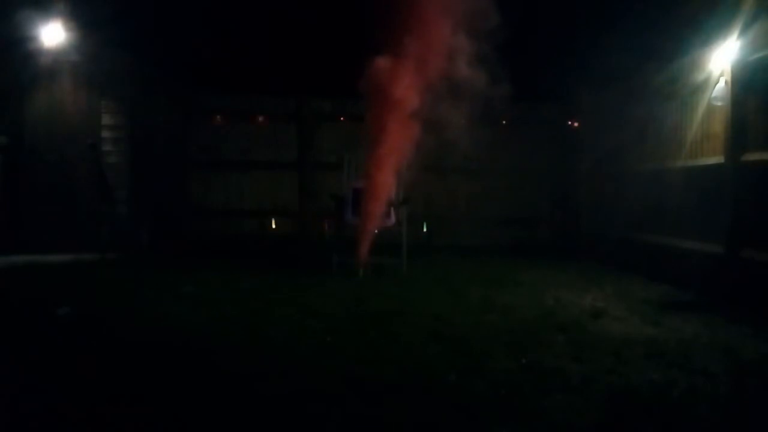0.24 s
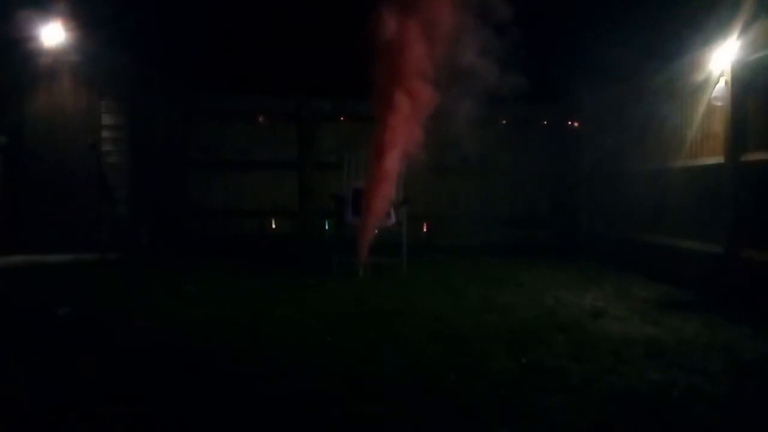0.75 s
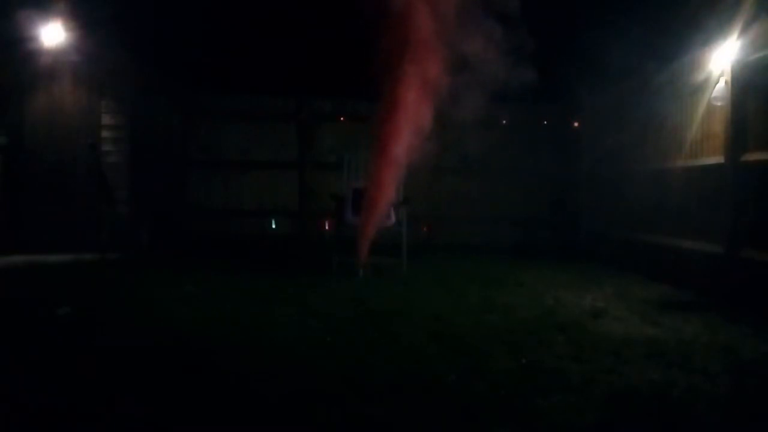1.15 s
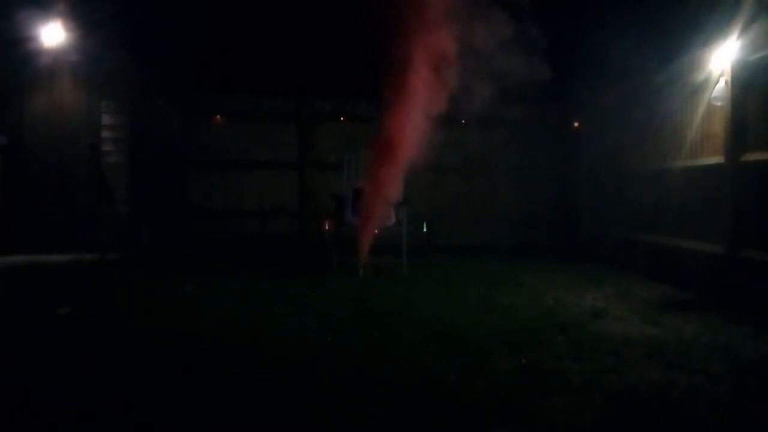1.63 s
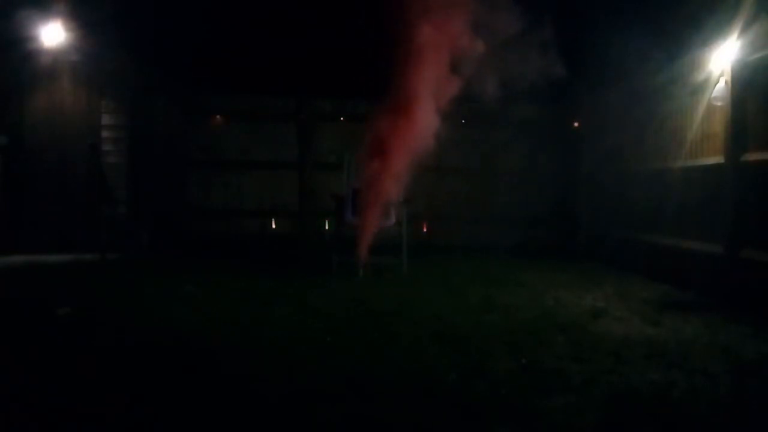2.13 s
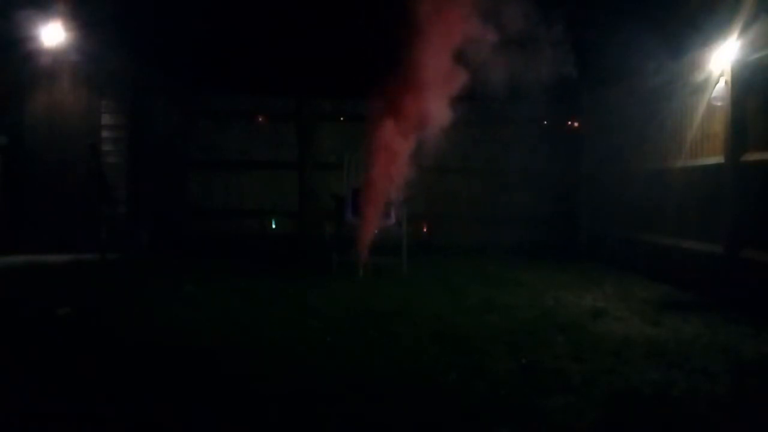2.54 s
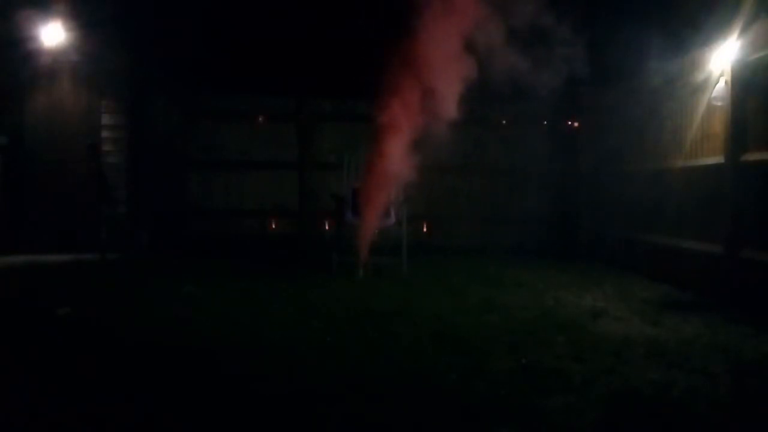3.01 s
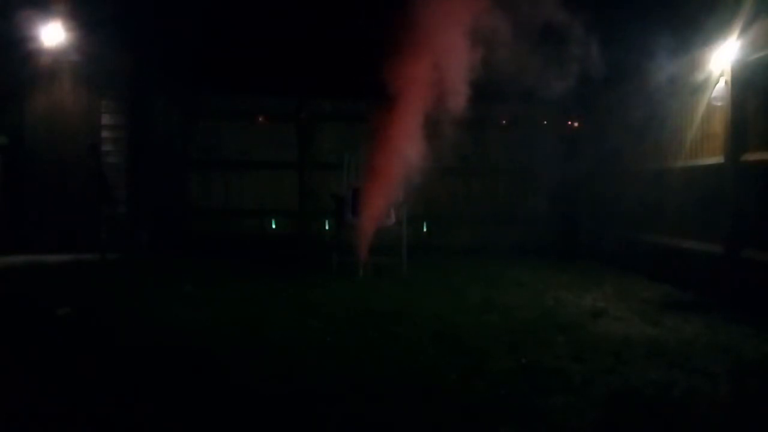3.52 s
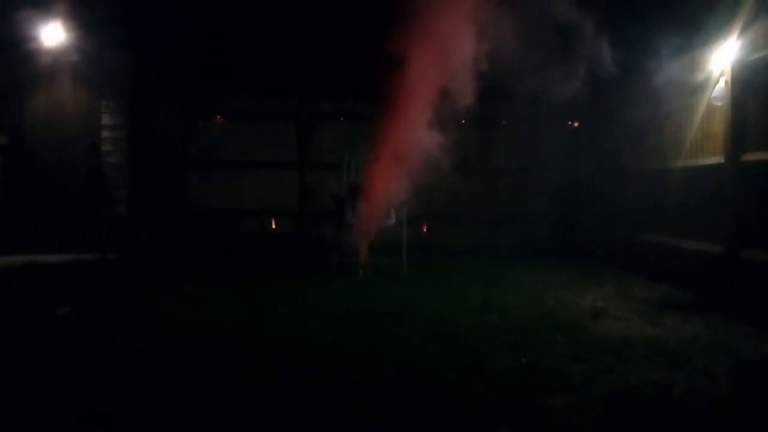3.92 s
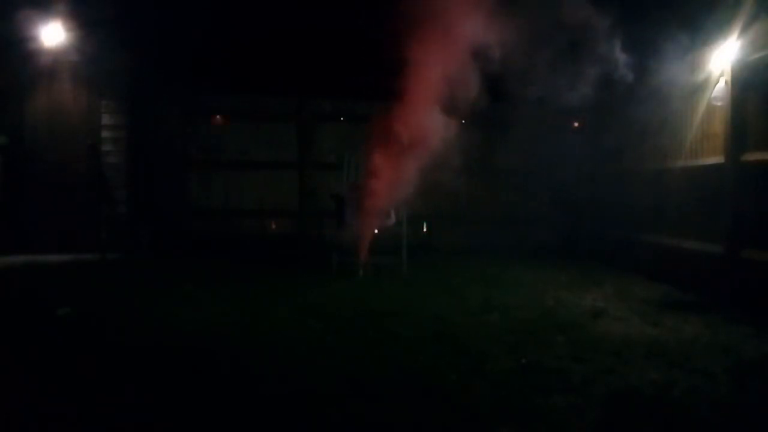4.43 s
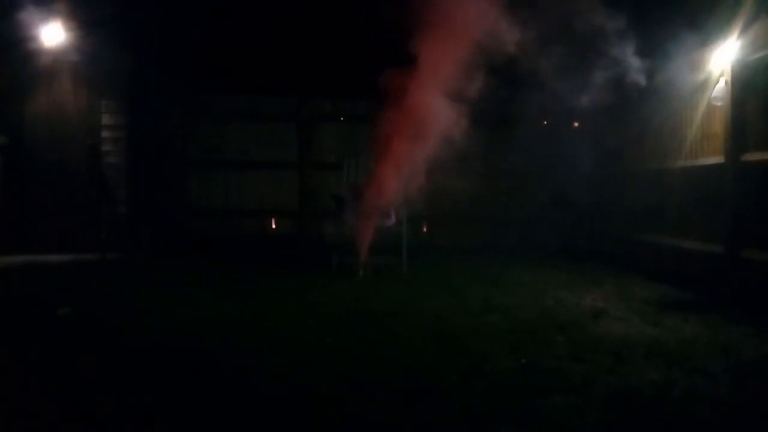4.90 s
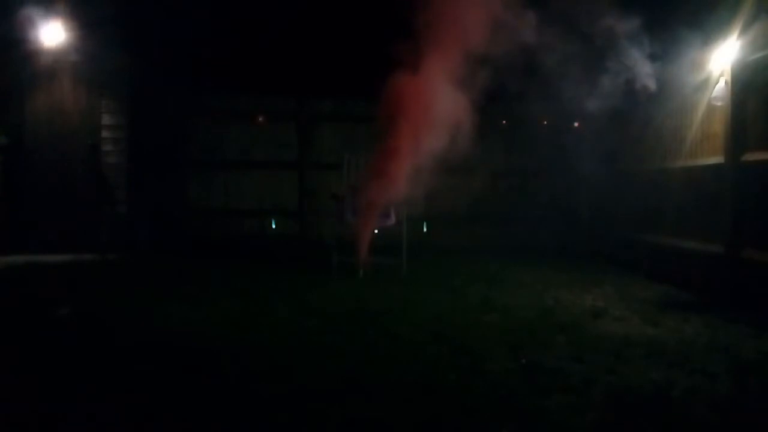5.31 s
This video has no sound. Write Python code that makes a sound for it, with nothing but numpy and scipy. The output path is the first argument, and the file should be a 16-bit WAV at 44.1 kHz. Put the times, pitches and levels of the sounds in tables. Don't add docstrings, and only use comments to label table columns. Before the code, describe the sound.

A smoke canister hisses throughout, about five and a half seconds, some metres from a hand-held camera in a walled yard. The hiss is dense and bright, mostly 2 to 8 kHz, with a softer roar around 1 kHz and a breathy band near 2 kHz. It starts slightly stronger, with a soft tap at 0.0, then settles, wavering gently as its treble colour shifts. A faint brush comes at 1.3 and dull, very low bumps around 1.6 to 1.8. At 2.9 a sharp crack bursts out, much louder than the hiss, breaking into an irregular volley of dull pops and gritty snaps for a quarter second; the yard's mid-low echo dies over about a second. Around 3.7 the gas gushes briefly. From 4.7 to 5.05 come soft camera knocks, the firmest near 4.9 with a quick downward scuff. Far traffic murmurs faintly underneath; the hiss runs to the end. Nearly mono.

```python
import sys
import numpy as np
from scipy import signal
from scipy.fft import irfft
from scipy.io import wavfile
from scipy.ndimage import uniform_filter1d, map_coordinates

SR = 44100
rng = np.random.default_rng(int(sys.argv[2]) if len(sys.argv) > 2 else 0)


def unload_wav(signal):
    wavfile.write(
        sys.argv[1],
        SR,
        np.round(np.clip(np.atleast_2d(signal).T, -1, 1) * 32767).astype(np.int16),
    )


def decibels_to_gain(level_db):
    exponent = np.asarray(level_db, float) / 20
    return 10 ** exponent


N = 245195


def evened(x):
    return x / np.sqrt(np.mean(x ** 2) + 1e-20)


def read(points, hz):
    f, value = np.transpose(points)
    return np.interp(np.log(hz + 1), np.log(f + 1), value)


def add(mix, s, sound):
    part = mix[max(round(s * SR), 0):][:len(sound)]
    part += sound[:len(part)]


def turbulence(shape, patchy_db, flicker_db):
    frames = N // 256 + 5
    hz = np.fft.rfftfreq(1024, 1 / SR)[:, None]
    real, imaginary, patches = rng.standard_normal((frames, 513, 3)).T
    patches = uniform_filter1d(patches, size=14, axis=0)
    patches = evened(uniform_filter1d(patches, size=24, axis=1))
    flicker = evened(uniform_filter1d(rng.standard_normal(frames), size=5))
    level = decibels_to_gain(read(shape, hz) + patchy_db * patches + flicker_db * flicker)
    spectra = (real + 1j * imaginary) * level
    return evened(signal.istft(spectra, nperseg=1024, noverlap=768)[1][:N])


def tail(decays, colour, start_ms):
    taps = np.zeros(SR)
    at = np.arange(0, SR - 20, 20)
    taps[at + rng.integers(0, 20, len(at))] = rng.choice([-1., 1.], len(at))
    hz, t, z = signal.stft(taps, SR, nperseg=512)
    level_db = read(colour, hz)[:, None] - 60 * t / read(decays, hz)[:, None]
    out = signal.istft(z * decibels_to_gain(level_db), SR, nperseg=512)[1]
    out *= np.clip(np.arange(len(out)) / SR / (start_ms / 1000), 0, 1)
    return out / np.linalg.norm(out)


# f/Hz, level/dB per Hz
HISS = [(940, -43.5), (1600, -22), (2200, -14), (2400, -6), (2600, -8), (2720, -4.5), (2980, -7),
        (3360, -5), (3640, -5), (3910, -4.5), (4380, -2.5), (4900, -4.5), (6520, -4), (7800, -17),
        (10100, -38.5), (17200, -120)]


def hiss(pressure_db):
    return decibels_to_gain(-37 + pressure_db) * turbulence(HISS, patchy_db=0.83, flicker_db=0.36)


# f/Hz, level/dB per Hz
FIZZ = [(4590, -14), (7800, -3.5), (8750, 0), (10900, -8), (11800, -15), (13300, -27), (13700, -37),
        (15100, -8.5), (15800, -29)]


def fizz(pressure_db):
    return decibels_to_gain(-61 + 1.6 * pressure_db) * turbulence(FIZZ, patchy_db=2.8, flicker_db=0.5)


# f/Hz, level/dB per Hz
ROAR = [(130, -66), (220, -27), (360, -13), (503, -5.5), (672, -3.5), (715, -1.5), (981, -2), (1170, -3.5),
        (1380, -6), (1800, -9.5), (2340, -15), (3960, -120)]


def roar(pressure_db, choke_db):
    level_db = -52 + 0.7 * pressure_db + 0.14 * choke_db
    return decibels_to_gain(level_db) * turbulence(ROAR, patchy_db=0.65, flicker_db=1.55)


def throat(choke_db):
    shape = [(1200, -61), (1650, 0.0), (2100, 5.5), (2500, -7.0), (3200, -36)]
    return decibels_to_gain(-59 + choke_db) * turbulence(shape, patchy_db=3.0, flicker_db=1.0)


# f/Hz, level/dB per Hz
SPURT = [(600, -36), (1060, -3), (1400, -16), (2000, -4.5), (2600, 0.5), (3150, -8), (4500, -5), (6300, 0),
         (7800, -17), (10500, -27), (13500, -50), (15500, -42)]
SPURT_DB = -32


def spurt(t):
    peak_s, rise_s, fall_s, edge_db = 3.69, 0.23, 0.15, -25.5
    away = np.where(t < peak_s, (peak_s - t) / rise_s, (t - peak_s) / fall_s)
    return decibels_to_gain(SPURT_DB + edge_db * away ** 2.2) * turbulence(SPURT, patchy_db=0.7, flicker_db=0.5)


# delay/ms, share of the direct sound
WALLS = [(1.097, .11), (1.38, .08), (1.8, .07), (2.54, .08), (5.374, .2), (5.62, .08), (6.111, .05),
         (6.4, .06), (7.183, -.05), (8.118, .05), (9.677, -.05), (12.14, .05), (12.491, .06), (14.184, .05),
         (16.344, -.07)]


def near_walls(gas, t):
    hz = np.fft.rfftfreq(4096, 1 / SR)
    echoes = sum(share * np.exp(-2j * np.pi * hz * ms / 1000) for ms, share in WALLS)
    comb = 1 + 1.3 * echoes
    wet = 0
    for k in range(3):
        far = tail([(300, 1.0), (3000, 0.56), (10000, 0.34)], [(100, 3.5), (3000, -5.3), (12000, 0)], start_ms=3.6)
        drift = np.cos(2 * np.pi * (0.12 * t + k / 6))
        wet = wet + signal.oaconvolve(gas * drift, far)[:N]
    gas = signal.oaconvolve(gas, irfft(comb))[:N] + decibels_to_gain(-4.5) * wet
    dip_hz, sharpness, share = 1520, 12.8, 0.32
    return gas - share * signal.lfilter(*signal.iirpeak(dip_hz, sharpness, SR), gas)


# t/s, delay/ms, share of the treble reflected
HAND = [
    (0, 0.76, 0.19),
    (.6, 0.63, -0.42),
    (1.5, 0.62, -0.17),
    (2.2, 0.56, -0.23),
    (2.7, 0.513, -0.48),
    (3.4, 0.524, -0.19),
    (3.7, 0.35, -0.035),
    (5.56, 0.38, -0.35),
]


def hand(gas, t):
    s, ms, share = np.transpose(HAND)
    late = map_coordinates(gas, [np.arange(N) - np.interp(t, s, ms) * SR / 1000], order=3)
    treble = signal.butter(2, [4500, 12500], "band", fs=SR, output="sos")
    return gas + np.interp(t, s, share) * signal.sosfiltfilt(treble, late)


# t/s, gas pressure level/dB, choking of the vent level/dB
JET = [(0.01, 3.5, 15), (0.08, 2.5, 6), (0.25, 1.5, 13), (0.45, 0.5, -14), (0.8, 0, -5), (1.05, 1, -8),
       (1.35, -0.3, 0.5), (1.6, 0.5, 1), (1.9, -0.6, 1.5), (2.22, 1.5, 10.5), (2.62, 0, 6.5),
       (2.82, -0.3, -8), (3.42, 0.5, 6), (3.9, 0.2, 7), (4.0, -0.4, 4.5), (4.45, 0.7, 6.5), (4.9, -0.5, -1),
       (5.55, -0.8, -8)]


def jet():
    t = np.arange(N) / SR
    s, pressure_db, choke_db = np.transpose(JET)
    pressure_db = np.interp(t, s, pressure_db)
    choke_db = np.interp(t, s, choke_db)
    gas = hiss(pressure_db) + fizz(pressure_db) + roar(pressure_db, choke_db) + throat(choke_db) + spurt(t)
    return decibels_to_gain(-3) * hand(near_walls(gas, t), t)


# t/s, peak level/dB, length/ms
POPS = [(2.9047, -11, 0.84), (2.9136, -13.5, 2.3), (2.9212, -16.5, 3.5), (2.9304, -21, 3.3),
        (2.9336, -16, 0.59), (2.938, -6.5, 1.7), (2.9447, -14.5, 3.5), (2.9517, -9, 2.2),
        (2.9616, -15, 0.6), (2.9714, -18, 1.4), (2.9805, -13.5, 0.63), (2.9866, -11, 0.91),
        (2.9965, -21, 0.9), (3.003, -15, 0.8), (3.012, -18.5, 1.8), (3.023, -11.5, 0.83),
        (3.0607, -15.5, 4), (3.0654, -17.5, 1.3), (3.0773, -16, 3), (3.086, -14, 4.3), (3.1052, -18, 1.6),
        (3.123, -30, 1.7), (3.1529, -23.5, 2.2)]


def pops():
    out = np.zeros(N)
    t = np.arange(-220, 660) / SR
    for (s, db, ms), chance in zip(POPS, rng.standard_normal(len(POPS))):
        hz = (720 + 900 * (s - POPS[0][0])) * (1 + 0.06 * chance)
        u = abs(t) * 1000 / ms
        shape = np.where(t < 0, np.exp(-(u / 0.36) ** 2), np.exp(-(u / 0.7) ** 1.3))
        deeper = 0.17 * np.cos(2 * np.pi * 0.65 * hz * t)
        add(out, s - 220 / SR, -decibels_to_gain(db) * shape * (np.cos(2 * np.pi * hz * t) + deeper))
    return out


# t/s, peak level/dB
FRONTS = [(2.9049, -19.6), (2.9369, -19), (2.9438, -20), (2.9509, -24), (2.9659, -25), (2.9692, -25.5),
          (2.9725, -25.5), (2.9757, -19.5), (2.9827, -21), (2.9863, -17.5), (2.9961, -23.5), (3.0017, -26),
          (3.0073, -24), (3.0227, -16.5), (3.0585, -20), (3.0629, -26), (3.0748, -20.5), (3.0798, -24.5),
          (3.0852, -23), (3.0899, -24.5), (3.0939, -24.5)]


def fronts():
    out = np.zeros(N)
    u = 2 * np.pi * 1750 * np.arange(660) / SR
    shock = (1 - u) * np.exp(-u)
    blunt = np.exp(-(np.arange(-20, 21) / SR * 1000 / 0.048) ** 2)
    shock = np.convolve(shock, blunt / blunt.sum())
    for s, db in FRONTS:
        add(out, s - 24 / SR, -decibels_to_gain(db + 12.5) * shock)
    grit = decibels_to_gain(-7) * tail([(1000, 0.044), (5000, 0.047)], [(600, -24), (1500, -1.0), (5000, 0)], start_ms=2.0)
    return out + signal.oaconvolve(out, grit)[:N]


# f/Hz, level/dB per Hz
BLAST = [(24, -77), (40, -51), (97, -10), (251, -26), (384, -9.5), (531, 5.5), (599, -7), (677, 4.5),
         (1030, 2), (1550, -10.5), (2060, -6.5), (3920, -21), (5000, -16), (6500, -45), (11000, -120)]
# f/Hz, t60/s
YARD = [
    (100, 1.2),
    (260, 1.84),
    (700, 1.47),
    (1840, 1.2),
]


def yard_answer():
    feed = np.zeros(N)
    for s, db, _ in POPS:
        add(feed, s, decibels_to_gain([db]))
    near = decibels_to_gain(10) * tail([(100, 0.16), (700, 0.24), (3000, 0.18)], BLAST, start_ms=2.8)
    far = decibels_to_gain(5.5) * tail(YARD, BLAST, start_ms=72)
    return signal.fftconvolve(feed, near + far)[:N]


def crack():
    return housing(pops() + fronts()) + yard_answer()


def puffs(table, spread):
    out = np.zeros(N)
    t_ms = np.arange(6000) / SR * 1000
    for s, db, hz, ms in table:
        band = signal.butter(2, [hz / spread, hz * spread], "band", fs=SR, output="sos")
        envelope = (t_ms / ms) ** 0.21 * np.exp(-2.5 * t_ms / ms)
        puff = signal.sosfilt(band, rng.standard_normal(6000) * envelope)
        add(out, s, decibels_to_gain(db) * puff / abs(puff).max())
    return out


# t/s, peak level/dB, centre f/Hz, length/ms
KNOCKS = [
    (.019, -31, 700, 11),
    (1.309, -41, 470, 88),
    (4.689, -39.5, 730, 41),
    (4.892, -30.5, 500, 30),
    (5.012, -39.5, 1250, 17),
    (5.03, -42, 480, 85),
]


def knocks():
    scuff = []
    for u in np.linspace(0, 1, 7):
        scuff.append((4.858 + 0.035 * u, -37, 2000 * (360 / 2000) ** u, 18))
    return housing(puffs(KNOCKS + scuff, spread=1.7))


# t/s, peak level/dB, f/Hz, length/ms
BUMPS = [
    (2.905, -48, 104, 90),
    (0.1, -60.5, 100, 140),
    (1.63, -56, 85, 77),
    (1.806, -54, 40.4, 28),
    (1.829, -62, 59.2, 27),
    (2.128, -67, 96.9, 40),
    (4.749, -68, 102, 45),
    (4.876, -53, 118, 58),
]


def bumps():
    return puffs(BUMPS, spread=1.5)


# f/Hz, level/dB
HOUSING = [(20, -30), (100, -12), (160, -16), (215, -34), (330, -6), (450, 0), (6000, 0), (8000, -20),
           (12000, -50), (22050, -70)]


def housing(x):
    log_gain = np.log(decibels_to_gain(read(HOUSING, abs(np.fft.fftfreq(8192, 1 / SR)))))
    phase = -signal.hilbert(log_gain).imag
    taps = np.fft.ifft(np.exp(log_gain + 1j * phase)).real[:4096]
    return signal.oaconvolve(x, taps)[:N]


# f/Hz, level/dB per Hz
RUMBLE = [(15, -44), (25, -28), (54, -36), (86, 3), (102, 5), (145, -7), (220, -28), (290, -40),
          (480, -120)]


def rumble():
    return decibels_to_gain(-79) * turbulence(RUMBLE, patchy_db=4.0, flicker_db=2.0)


def capsule():
    shape = [(10000, -30), (12000, -4), (13500, -6), (15000, 0), (15700, -1.5)]
    return decibels_to_gain(-83) * turbulence(shape, patchy_db=0.25, flicker_db=2.0)


def scene():
    mono = jet() + crack() + knocks() + bumps() + rumble() + capsule()
    return np.tile(mono, (2, 1))


# t/s, centre f/Hz
SPLITS = [(0.246, 4800), (.673, 5130), (.85, 5470), (.85, 7600), (.85, 13100), (2.084, 4630),
          (2.084, 15000), (2.458, 5500), (3.46, 6300), (3.46, 11700), (4.174, 4800), (4.174, 12000),
          (4.174, 15000), (4.287, 5130), (4.287, 14100), (4.476, 7040), (4.957, 9600), (5.149, 10300)]


def channel_splits(x):
    hz, t, z = signal.stft(x, SR, nperseg=512)
    gate = 0
    for s, centre_hz in SPLITS:
        band = abs(hz - centre_hz) < 650
        moment = np.cos(np.pi / 2 * np.clip((t - s) / 0.02, -1, 1))
        gate = gate + decibels_to_gain(-1) * band[:, None] * moment
    scrambled = z * gate * np.exp(2j * np.pi * rng.random(z.shape))
    side = signal.istft(scrambled, SR, nperseg=512)[1][:N]
    return side * np.array([[1], [-1]])


def roll_off(x):
    return signal.sosfilt(signal.butter(12, 16980, fs=SR, output="sos"), x)


def record(dry):
    dry = signal.lfilter(*signal.iirnotch(212, 3.5, SR), dry)
    dry = signal.lfilter(*signal.butter(1, 45, "high", fs=SR), dry)
    mix = dry + channel_splits(dry[0])
    edge = signal.firwin(801, 15720, window=("kaiser", 9), fs=SR)[None]
    mix = signal.oaconvolve(mix, edge, "same")
    return roll_off(mix)


dry = scene()
out = record(dry)
unload_wav(out)
```